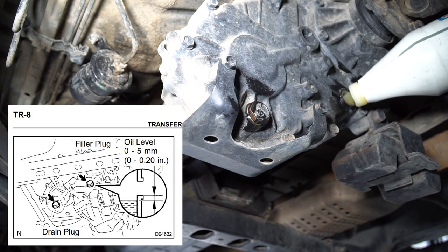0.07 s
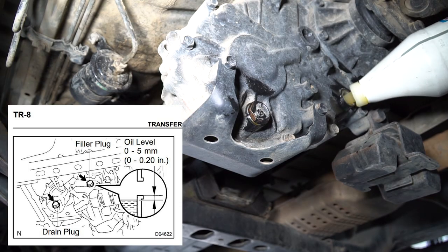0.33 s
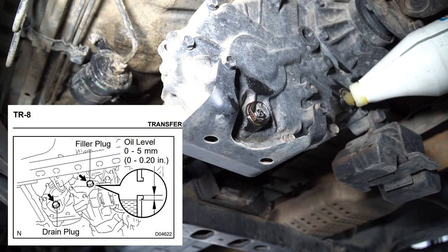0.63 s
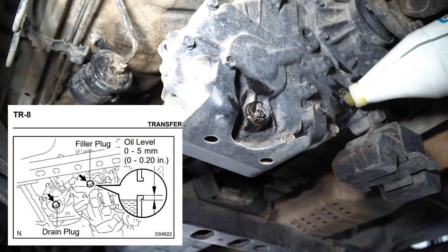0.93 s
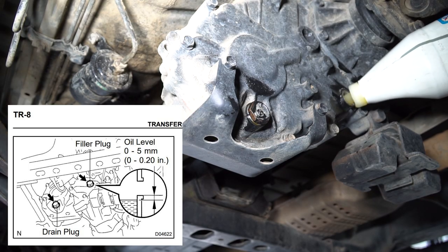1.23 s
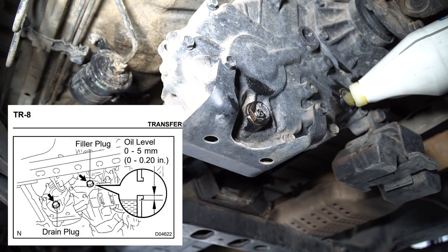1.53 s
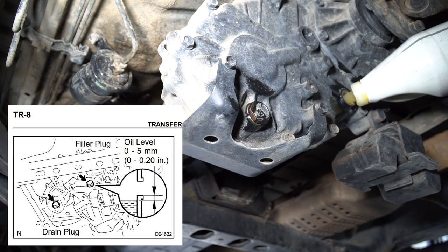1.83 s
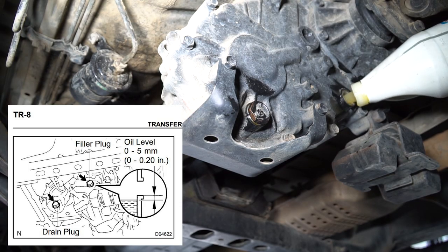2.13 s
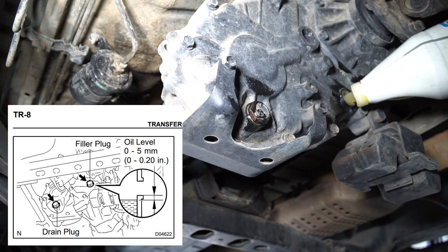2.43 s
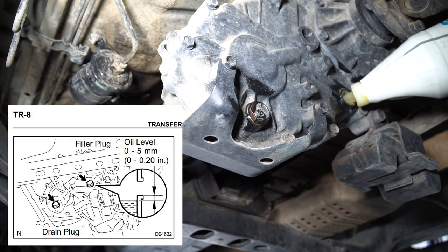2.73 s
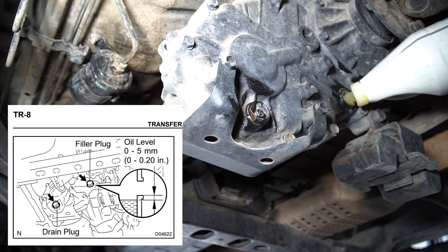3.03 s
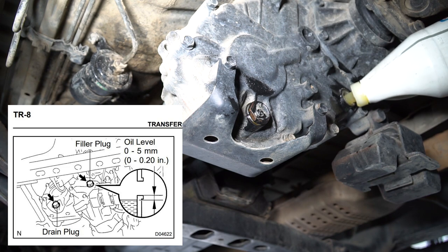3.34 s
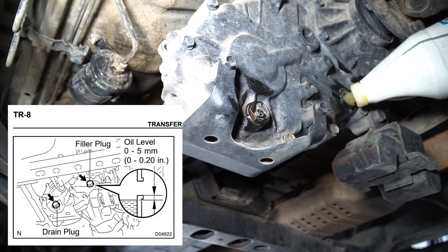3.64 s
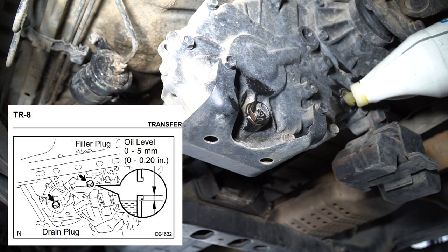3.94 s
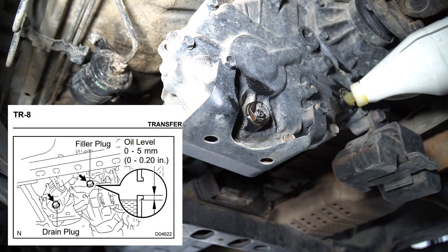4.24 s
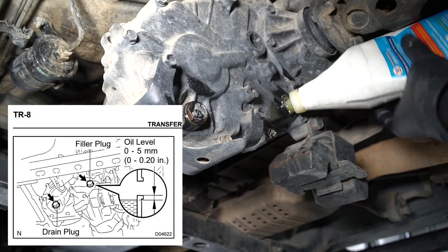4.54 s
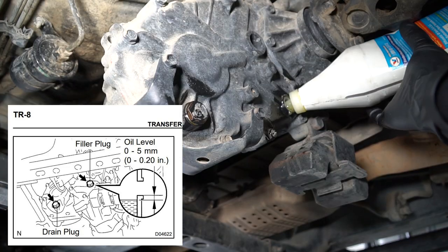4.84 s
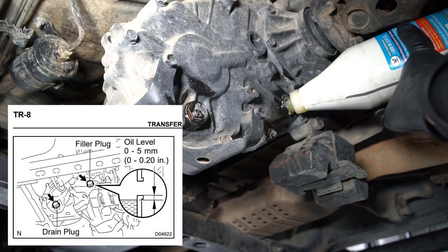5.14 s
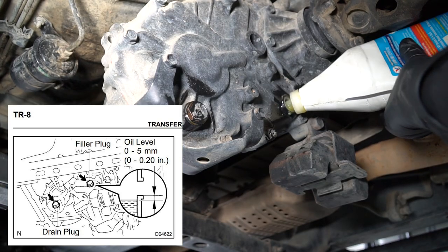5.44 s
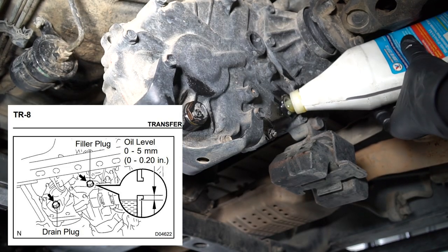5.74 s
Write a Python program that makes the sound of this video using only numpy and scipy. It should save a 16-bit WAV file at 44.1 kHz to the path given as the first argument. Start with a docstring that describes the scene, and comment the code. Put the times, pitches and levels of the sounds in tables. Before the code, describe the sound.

A soft seep of air over a quiet low rumble leads into three short, spitting spurts of oil and air, pumped from a plastic bottle into a metal gear case. Between the spurts, air hisses back through the wet nozzle with low glugs and soft plastic thumps. Small puffs and a faint hiss follow as the bottle is shifted. The sound is close, with tight echoes from beneath a vehicle.

```python
"""A low rumble and a soft seep of air, under a vehicle, the microphone close to a plastic bottle of gear oil.
The bottle is squeezed three times into the filler hole of a gear case. Plugs of oil burst ever faster
until air and oil sputter freely from the nozzle and ring the hollow case. After each squeeze the bottle
sucks air back, gulps and flexes; at the end it is shifted in the hand and hisses softly.
Short echoes come back from between the chassis and the ground."""
import sys
import numpy as np
from scipy import signal
from scipy.fft import rfft, irfft, next_fast_len
from scipy.io import wavfile
from scipy.ndimage import uniform_filter1d, map_coordinates

SR = 44100
rng = np.random.default_rng(int(sys.argv[2]) if len(sys.argv) > 2 else 0)


def transcribe(u):
    """Save the signal u as a 16-bit wav file named by the first command-line argument.

    u: samples, shape (n,) or (channels, n), limited to [-1, 1]; the rate is SR.
    q: integer samples, one column per channel.
    """
    v = np.clip(np.atleast_2d(u).T, -1, 1)
    q = np.round(v * 32767).astype(np.int16)
    wavfile.write(sys.argv[1], SR, q)


N = 263584

# colours of the faint hiss and the low rumble of the place: (frequency [Hz], level [dB])
FLOOR_COLOUR = [(60, -14), (150, 0), (300, -3), (500, -10.5), (800, -9.5), (1200, -19), (2000, -23.5),
                (3500, -26.5), (7200, -28), (9500, -35), (13000, -34), (16000, -49)]
RUMBLE_COLOUR = [(15, -6.5), (50, -7.5), (110, -9.5), (200, -20), (400, -43), (2000, -110)]
# tones of the background hum: (frequency [Hz], level [dB])
HUM_TONES = [(54, -54.5), (99, -58.5)]
# air seeping from the held bottle, and light presses that blow only air into the case:
# (start [s], strongest [s], end [s], level [dB])
SEEPS = [(-0.1, 0, 0.46, -62.5), (4.507, 4.57, 4.787, -60.5), (5.285, 5.517, 5.69, -53),
         (5.697, 5.744, 5.97, -57.5)]
BLOWS = [(-0.1, -0.014, 0.88, -55.5), (5.41, 5.925, 6.11, -53.5)]
# colours of the seeping air, the hollow blowing and the rubbed wall: (frequency [Hz], level [dB])
SEEP_COLOUR = [(400, 4), (1900, -1), (2700, -5), (3600, 0.5), (5200, 0.5), (6600, 6.5), (8100, -4),
               (9300, -11.5), (11000, -8), (12200, -5.5), (13800, -23), (16000, -45)]
BLOW_COLOUR = [(200, -25), (480, -14), (660, -2), (760, -5.5), (860, 2), (1100, -16.5), (1420, -9),
               (2000, -15.5), (2600, -19.5), (3500, -19.5), (8000, -31)]
RUB_COLOUR = [(60, -15), (130, -4), (260, 0), (400, -8), (600, -25), (1500, -70)]
# resonances of the gap the air seeps through: (frequency [Hz], width [Hz], level [dB])
SLIT_MODES = [(7220, 190, -5.5), (7850, 89, 0.5), (8600, 110, -5), (11300, 420, -10.5)]
# the glove rubbing on the bottle: (start [s], length [s], level [dB])
GLOVE_RUBS = [(-0.02, 0.064, -48), (0.407, 0.22, -52.5), (2.15, 0.056, -51.5), (4.387, 0.071, -51.5),
              (5.47, 0.185, -53)]
# air drawn back through the wet nozzle: (start [s], strongest [s], end [s], level [dB])
AIR_DRAWS = [(0.156, 0.197, 0.28, -52.5), (1.323, 1.328, 1.49, -47.5), (1.465, 1.537, 1.665, -48),
             (2.724, 2.77, 2.95, -52), (2.916, 2.988, 3.142, -51.5), (3.894, 3.913, 4.162, -50),
             (4.157, 4.213, 4.56, -66)]
# puffs as the nozzle clears: (time [s], level [dB], t60 [s])
NOZZLE_PUFFS = [(0.79, -46, 0.057), (1.572, -33.5, 0.051), (2.074, -42.5, 0.045), (2.735, -34, 0.35),
                (3.060, -34.5, 0.073), (3.887, -39, 0.12), (4.403, -36, 0.23), (4.789, -41, 0.25),
                (5.084, -39.5, 0.062), (5.15, -51.5, 0.53)]
# colour of the draws and puffs: (frequency [Hz], level [dB])
SUCTION_COLOUR = [(400, -5), (1800, -8.5), (2800, -11.5), (3600, -7), (5000, -8.5), (6400, -2.5),
                  (8000, -4), (9200, -17), (11200, -9.5), (12500, -18), (16000, -32)]
# resonances of bottle neck, nozzle and the air in the gear case: (frequency [Hz], width [Hz], level [dB])
NECK_MODES = [(3300, 180, -11), (3940, 32, -2.5), (4260, 100, -5.5), (4700, 50, -2.5), (5160, 33, -0.5),
              (5460, 50, -1.5), (6000, 290, -3.5), (6600, 210, -2.5), (7790, 69, -3.5), (8310, 55, -30),
              (10370, 30, -3), (11000, 30, -22.5)]
NOZZLE_MODES = [(4660, 36, -2.5), (4940, 80, -0.5), (5390, 110, 0.5), (6123, 73, 4.5), (6940, 45, 5),
                (6850, 37, 4), (7400, 21, 0), (7920, 55, -1), (8500, 88, -7)]
CASE_MODES = [(252, 17, -2.5), (352, 57, -11), (424, 43, -0.5), (469, 43, -2.5), (527, 60, -3.5),
              (599.5, 29, -2.5), (654, 30, -5), (733, 76, -3.5), (804, 38, 4), (915, 51, -9.5),
              (1002, 16.6, -3), (1260, 12, -15.5), (1468, 27, -4.5), (1555, 18, -14.5), (1975, 27, -8),
              (2083, 70, -11), (2280, 31, -17), (2450, 38, -16), (2660, 21, -10), (2746, 19, -8.5),
              (3180, 30, -12), (3330, 62, -11), (3865, 80, -12), (3950, 25, -10), (4260, 280, -13.5)]
# thin whistles of seeping air, and squeaks of air through the oil film:
# (start [s], length [s], first pitch [Hz], last pitch [Hz], level [dB])
SEEP_WHISTLES = [(0.3, 0.19, 11500, 12100, -70), (0.36, 0.37, 13200, 12900, -74),
                 (0.4, 0.33, 8100, 9000, -72), (0.65, 0.11, 12900, 11700, -67),
                 (5.68, 0.35, 11800, 13300, -69), (5.88, 0.14, 14200, 14430, -77)]
FILM_SQUEAKS = [(1.457, 0.025, 4800, 6100, -55), (1.458, 0.023, 6100, 7250, -55),
                (1.567, 0.034, 4500, 4330, -46.5), (4.172, 0.12, 3680, 3400, -61),
                (4.2, 0.16, 7250, 6200, -72), (4.37, 0.042, 4800, 3200, -59)]
# gulps of air entering the oil: (time [s], level [dB], first pitch [Hz])
AIR_GULPS = [(0.425, -41.5, 116), (1.497, -33.5, 87), (1.53, -26.5, 103), (1.572, -23.5, 235),
             (2.955, -29, 102.6), (3.003, -30.5, 102), (3.058, -29.5, 96), (3.885, -33.5, 104),
             (5.088, -33.5, 226), (5.142, -34.5, 77)]
# squeezes of the bottle: (start [s], full flow [s], end [s], spray [dB], case ring [dB],
# bubble pitch [Hz], plug level [dB], first gap between plugs [s], next gap over last [ratio])
BOTTLE_SQUEEZES = [(0.8948, 1.001, 1.339, -33.5, -32.5, 470, -26.5, .0343, .76),
                   (2.28, 2.364, 2.739, -33, -29.5, 630, -23, .0261, .88),
                   (3.2992, 3.484, 3.867, -34, -35, 490, -27.5, .0333, 0.92)]
# big spits of oil in mid-flow: (time [s], level [dB], centre [Hz])
OIL_SPITS = [(1.1189, -14.5, 6560), (3.5106, -13.5, 5600), (3.5632, -21.5, 7790), (3.6724, -23, 9100)]
# colours of a bursting plug, the spray and the churning oil: (frequency [Hz], level [dB])
POP_COLOUR = [(200, 8), (800, 13), (1200, -9), (2900, -3.5), (4200, 4), (6500, 1), (8000, 4), (9200, -10.5),
              (11500, -8), (16000, -22)]
SPRAY_COLOUR = [(150, -41), (900, -52), (1200, -7), (2900, -9), (4200, -8.5), (5600, 0.5), (7600, 2.5),
                (8400, -5), (9200, -9.5), (11000, -3.5), (12800, -7.5), (14500, -18), (16000, -36.5)]
CHURN_COLOUR = [(25, -37), (70, -1.5), (120, -3), (165, -4.5), (205, -7), (255, 5), (310, -19.5),
                (900, -66)]
# the bottle wall flexing back: (time [s], level [dB], treble corner [Hz])
WALL_FLEXES = [(1.573, -23.5, 380), (1.733, -37.5, 283), (2.954, -33.5, 220), (3.039, -29, 450),
               (3.061, -26, 1020), (3.886, -32.5, 560), (5.087, -31.5, 290), (5.136, -43.5, 295)]
# modes of the bottle wall: (frequency [Hz], level [dB], t60 [s])
WALL_MODES = [(151.4, 1.5, 0.038), (265, -2.5, 0.089), (398, -1.5, 0.049), (450, -16.5, 0.044),
              (585, -7, .07), (700, -7, 0.043), (863, -1.5, 0.034), (1138, -13, 0.063)]
# echo decay under the vehicle: (frequency [Hz], t60 [s])
UNDERBODY_DECAY = [(150, 0.15), (1000, 0.13), (6000, 0.17), (14000, 0.071)]

FLOOR_DB, RUMBLE_DB, STRAIN_DB = -58, -53, -45.5  # strain: the bottle rumbling under the pressing hand
WHISTLE_DRIFT, WHISTLE_ROUGH = .018, .022  # slow and fast unsteadiness, as shares of the pitch
PLUG_HZ, FIRST_PLUG_DB = 6460, -4  # centre of a plug's pop; a squeeze's first plug is softer
PLUG_RING_DB, SPIT_RING_DB = -3, -12  # trims on how hard plugs and spits drive the case
CHOKE_S, CHOKE_DB = .018, 16  # a forming plug closes the nozzle over this time, to this depth
CHURN_DB, CHURN_PEAK = -37, 0.67  # the churning is strongest at this share of a squeeze
SPENT_HZ = 332  # bubble pitch as a squeeze runs out
TOP_HZ = 15750


def amp(db):
    """Decibels to gain."""
    return 10 ** (np.asarray(db) / 20)


def unit(x):
    """x at rms 1."""
    return x / np.sqrt(np.mean(x ** 2) + 1e-20)


def along(points, hz):
    """(frequency, value) points read on a log axis."""
    f, v = np.transpose(points)
    return np.interp(np.log(hz + 1), np.log(f + 1), v)


def wobble(rate):
    """A smooth random curve, rate knots a second."""
    steps = np.arange(int(N * rate / SR + 2) * 6) / 6
    curve = map_coordinates(rng.standard_normal(int(steps[-1]) + 4), [steps])
    return np.interp(np.arange(N) * rate / SR, steps, curve)


def filtered(x, response):
    """x through a frequency response that keeps the power of white noise."""
    size = next_fast_len(len(x) + SR // 4)
    gain = response(np.fft.rfftfreq(size, 1 / SR))
    return irfft(rfft(x, size) * gain / np.sqrt(np.mean(abs(gain) ** 2)), size)[:len(x)]


def noise(colour):
    """Noise of rms 1 with the given colour."""
    return unit(filtered(rng.standard_normal(N), lambda hz: amp(along(colour, hz))))


def resonate(x, modes):
    """x through a bank of resonances of alternating sign."""
    f = np.geomspace(20, SR / 2, 8000)
    bank = sum((-1) ** k * amp(db) * 1j * f * width / (centre ** 2 - f ** 2 + 1j * f * width)
               for k, (centre, width, db) in enumerate(modes))
    return filtered(x, lambda hz: np.interp(hz, f, bank))


def bump(hz, centre, octaves, skirt_db):
    """A gain that peaks round a centre frequency, on a flat skirt."""
    return np.exp(-(np.log2((hz + 1) / centre) / octaves) ** 2) + amp(skirt_db)


def add(track, s, sound):
    """Mix a sound into the track at s seconds."""
    part = track[max(round(s * SR), 0):][:len(sound)]
    part += sound[:len(part)]


def strike(t60, attack):
    """Envelope with a quick rise and an exponential fall."""
    t = np.arange(SR // 3) / SR
    return (1 - np.exp(-t / attack)) * amp(-60 * t / t60)


def swell(length):
    """A smooth rise and fall lasting length seconds."""
    return np.hanning(max(int(length * SR), 8))


def stroke(start, peak, end, rise_db, sag_db, release_s):
    """Gain of one push of air: it climbs, sags ever faster as the pressure is spent, and closes."""
    t = np.arange(N) / SR
    to_go = np.interp(t, [start, peak], [1, 0])
    spent = np.interp(t, [peak, end], [0, 1])
    gate = np.clip((t - start) / 0.0017, 0, 1) * np.clip((end - t) / release_s, 0, 1)
    return gate * amp(-rise_db * to_go - sag_db * spent ** 2)


def glides(rows, waver):
    """Swelling tones that slide in pitch, each bent by a fresh curve from waver()."""
    out = np.zeros(N)
    for s, length, start_hz, end_hz, db in rows:
        shape = swell(length)
        hz = np.linspace(start_hz, end_hz, len(shape)) * (1 + waver()[:len(shape)])
        add(out, s, amp(db) * shape * np.sin(2 * np.pi * np.cumsum(hz) / SR))
    return out


def background():
    """The place itself: a low rumble and a wavering hum over a faint hiss."""
    t = np.arange(N) / SR
    hum = sum(amp(db + 4.5 * wobble(2.664)) * np.sin(2 * np.pi * hz * t + 1.5 * wobble(20))
              for hz, db in HUM_TONES)
    hiss = amp(FLOOR_DB) * noise(FLOOR_COLOUR)
    rumble = amp(RUMBLE_DB + 1.9 * wobble(3.66)) * noise(RUMBLE_COLOUR)
    return hiss + rumble + hum


def seeping():
    """Under a light grip air seeps through a narrow gap and blows softly across the hollow case."""
    seep = sum(amp(db) * stroke(*times, rise_db=11.5, sag_db=13.5, release_s=0.076)
               for *times, db in SEEPS)
    blow = sum(amp(db) * stroke(*times, rise_db=12.5, sag_db=9.5, release_s=0.2) for *times, db in BLOWS)
    hiss = amp(-0.5) * noise(SEEP_COLOUR) + amp(-4.5) * resonate(rng.standard_normal(N), SLIT_MODES)
    return seep * unit(amp(wobble(45))) * hiss + blow * noise(BLOW_COLOUR)


def rubs():
    """The shifting glove makes the soft wall grumble, and each squeeze makes it rumble."""
    grip = np.zeros(N)
    for s, length, db in GLOVE_RUBS:
        add(grip, s, amp(db) * swell(length))
    grumble = grip * unit(amp(4.3 * wobble(72))) * noise(RUB_COLOUR)
    strain = sum(stroke(start, full, end, rise_db=4.5, sag_db=1, release_s=0.018)
                 for start, full, end, *_ in BOTTLE_SQUEEZES)
    return grumble + amp(STRAIN_DB) * strain * noise(RUMBLE_COLOUR)


def underbody(x):
    """Dense short echoes reach the microphone from between the chassis and the ground."""
    hz, t, spectrum = signal.stft(rng.standard_normal(SR // 3), SR, nperseg=256)
    decay = amp(-60 * t / along(UNDERBODY_DECAY, hz)[:, None])
    _, tail = signal.istft(spectrum * decay, SR, nperseg=256)
    return signal.fftconvolve(x, np.pad(tail, (90, 0)) / np.linalg.norm(tail))[:N]


def suction():
    """Air hisses back through the nozzle and sings in the neck as the bottle regains its shape."""
    draw = sum(amp(db) * stroke(*times, rise_db=11, sag_db=21, release_s=0.067)
               for *times, db in AIR_DRAWS)
    draw *= unit(amp(1.9 * wobble(79)))
    puff = np.zeros(N)
    for s, db, t60 in NOZZLE_PUFFS:
        add(puff, s, amp(db - 14.5) * strike(t60, attack=0.00065))
    neck = resonate(rng.standard_normal(N), NECK_MODES)
    return (amp(-6) * draw + puff) * noise(SUCTION_COLOUR) + amp(-5) * draw * neck


def whistles():
    """The seeping air whistles very high and faintly; the pitch drifts with the grip."""
    return glides(SEEP_WHISTLES, lambda: WHISTLE_DRIFT * wobble(22) + WHISTLE_ROUGH * wobble(1100))


def gulps(t60=0.055, rise=3.8):
    """Each big bubble entering the oil rings low for a few cycles, its pitch rising."""
    out, shape = np.zeros(N), strike(t60, attack=0.00093)
    t = np.arange(len(shape)) / SR
    for s, db, hz in AIR_GULPS:
        add(out, s, amp(db) * shape / shape.max() * np.sin(2 * np.pi * hz * t * (1 + rise * t)))
    return out


def plugs():
    """Plugs at shrinking gaps, plus stray spits: (time [s], level [dB], ring trim [dB], centre [Hz])."""
    rows = [(s, db, SPIT_RING_DB, hz) for s, db, hz in OIL_SPITS]
    for start, full, *_, db, gap, shrink in BOTTLE_SQUEEZES:
        times = start + np.cumsum([0] + [gap * shrink ** k for k in range(8)])
        rows += [(s, db + FIRST_PLUG_DB * (s == start), PLUG_RING_DB, PLUG_HZ)
                 for s in times[times < full]]
    return rows


def bursts():
    """A plug of oil snaps open, the air behind it escapes and the case rings."""
    pops, kicks = np.zeros(N), np.zeros(N)
    shape = strike(t60=.04, attack=.0004) + amp(-12) * strike(t60=.09, attack=.002)
    for s, db, ring_db, hz in plugs():
        air = shape * rng.standard_normal(len(shape))
        pop = filtered(air, lambda f: amp(along(POP_COLOUR, f)) * bump(f, hz, octaves=0.44, skirt_db=-11))
        add(pops, s, amp(db - 7) * pop)
        add(kicks, s, amp(db + ring_db - 1) * strike(t60=.02, attack=.0003))
    return pops + resonate(kicks * rng.standard_normal(N), CASE_MODES)


def flow():
    """Spray, case ring and churn gains and the bubble pitch of all squeezes, one value per sample."""
    spray, ring, churn, pitch_points = np.zeros(N), np.zeros(N), np.zeros(N), []
    for start, full, end, spray_db, ring_db, bubble_hz, *_ in BOTTLE_SQUEEZES:
        spray += amp(spray_db) * stroke(start, full, end, rise_db=16.5, sag_db=18.5, release_s=0.12)
        ring += amp(ring_db) * stroke(start, full, end, rise_db=9.5, sag_db=20, release_s=0.16)
        strongest = start + CHURN_PEAK * (end - start)
        churn += amp(CHURN_DB) * stroke(start, strongest, end, rise_db=15.5, sag_db=23.5, release_s=.02)
        pitch_points += [(start, bubble_hz), (full, bubble_hz), (end, SPENT_HZ)]
    return spray, ring, churn, np.interp(np.arange(N) / SR, *np.transpose(pitch_points))


def sputter(rate, scatter, depth_db):
    """Oil closes the nozzle and is blown open again at an uneven rate: a sawtooth in level."""
    phase = np.cumsum(rate * np.exp(scatter * wobble(25))) / SR
    return unit(uniform_filter1d(amp(-depth_db * (phase % 1)), size=40))


def bubbling(level, pitch, bands_hz=(255, 450, 800)):
    """Bursting bubbles ring the case, pushing hardest near their pitch."""
    share = np.array([bump(pitch, hz, octaves=0.44, skirt_db=-2) for hz in bands_hz])
    bands = [filtered(rng.standard_normal(N), lambda f: bump(f, hz, octaves=.5, skirt_db=-1))
             for hz in bands_hz]
    drive = (share * bands).sum(axis=0) / np.linalg.norm(share, axis=0)
    return resonate(amp(-2) * level * unit(amp(2.5 * wobble(300))) * drive, CASE_MODES)


def squeezes():
    """A sputtering spray leaves the nozzle and churns the oil in the hollow case."""
    *levels, pitch = flow()
    spray, ring, churn = np.array(levels) * sputter(rate=42, scatter=.4, depth_db=7.5)
    choke_db = np.zeros(N)
    for s, *_ in plugs():  # each plug chokes the flow just before it bursts
        add(choke_db, s - CHOKE_S, np.linspace(0, -CHOKE_DB, int(CHOKE_S * SR)))
    spray, ring = spray * amp(choke_db), ring * amp(choke_db)
    spray *= unit(amp(0.67 * wobble(640)))  # the oil film tears in tiny snaps
    mist = noise([(3000, -40), (8000, -5), (10500, 24), (13000, -1), (16000, -30)])
    mist *= unit(amp(5 * wobble(31)))
    jet = spray * (amp(-3.5) * noise(SPRAY_COLOUR) + amp(-17.5) * mist)
    whistle = resonate(spray * rng.standard_normal(N), NOZZLE_MODES)
    return jet + amp(-7) * whistle + amp(-2) * bubbling(ring, pitch) + churn * noise(CHURN_COLOUR)


def squeaks(waver=0.072):
    """A closing gap in the oil film whistles with a gliding, unsteady pitch."""
    return glides(FILM_SQUEAKS, lambda: waver * wobble(1300))


def flexes():
    """The oil-damped wall pops back; duller pops leave the upper modes quiet."""
    out, t = np.zeros(N), np.arange(SR // 3) / SR
    for s, db, corner_hz in WALL_FLEXES:
        pop = np.zeros(len(t))
        for hz, mode_db, t60 in WALL_MODES:
            gain = amp(mode_db + rng.normal(0, 0.98)) / np.hypot(1, (hz / corner_hz) ** 2)
            cycles = hz * rng.normal(1, 0.048) * t + rng.random()
            pop += gain * strike(t60, attack=0.00067) * np.sin(2 * np.pi * cycles)
        add(out, s, amp(db) * pop / abs(pop).max())
    return out


def scene():
    """One microphone under the vehicle: the bottle close by, its echoes and the background."""
    bottle = (squeezes() + bursts() + suction() + seeping() + whistles()
              + squeaks() + gulps() + flexes() + rubs())
    return (amp(-0.3) * bottle + amp(-8) * underbody(bottle) + background())[None]


def record(dry):
    """The camera at the microphone position keeps nothing above its band limit."""
    size = next_fast_len(N + SR // 2)
    passband = np.fft.rfftfreq(size, 1 / SR) < TOP_HZ
    return irfft(rfft(dry, size) * passband, size)[:, :N]


dry = scene()
out = record(dry)
transcribe(out)
```